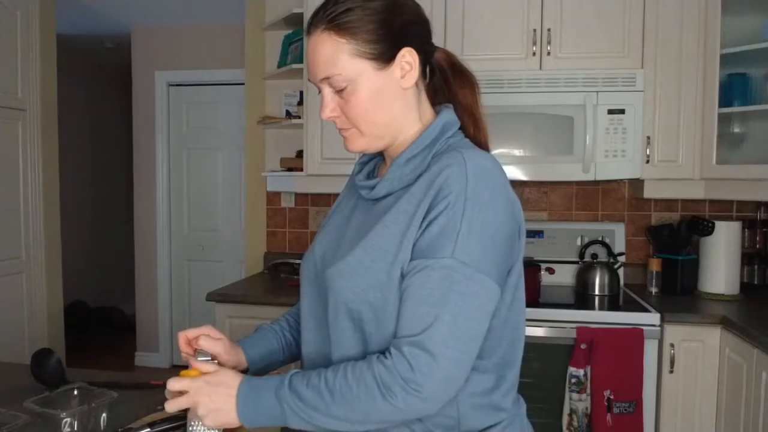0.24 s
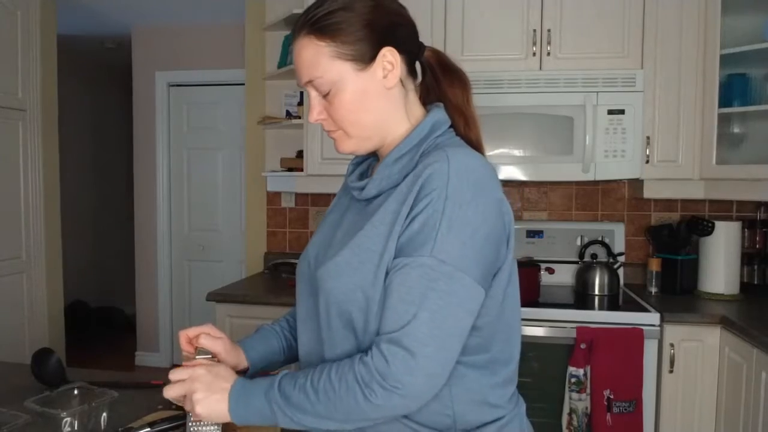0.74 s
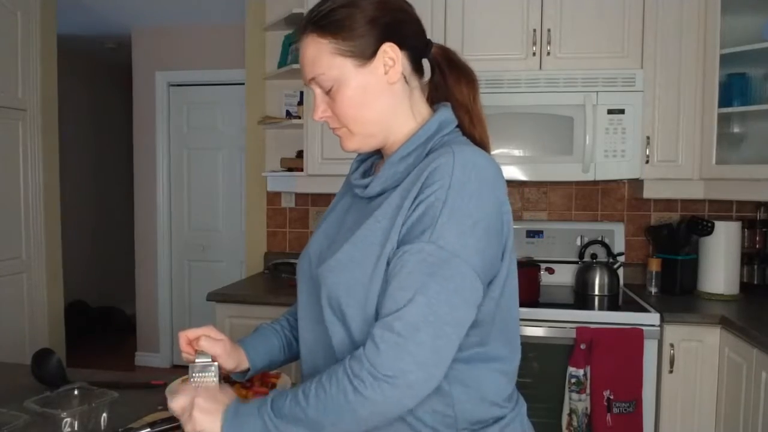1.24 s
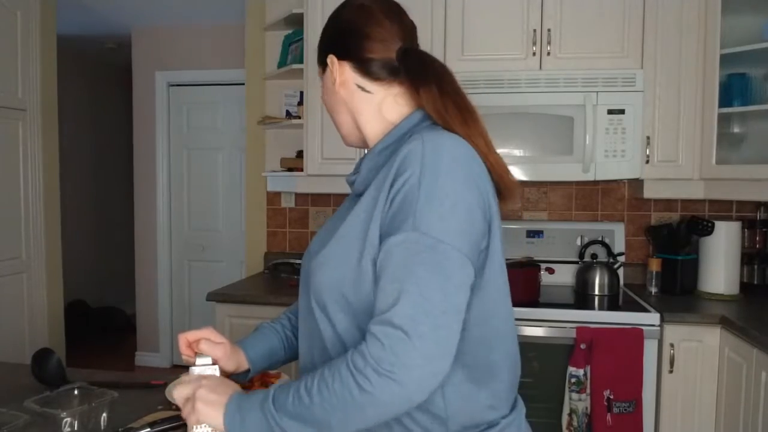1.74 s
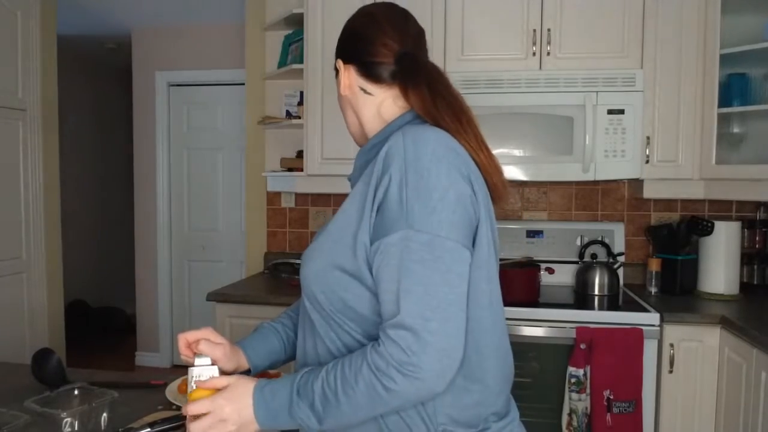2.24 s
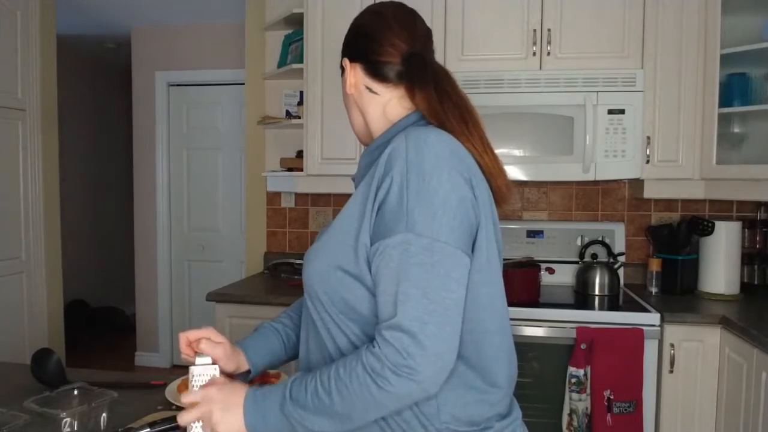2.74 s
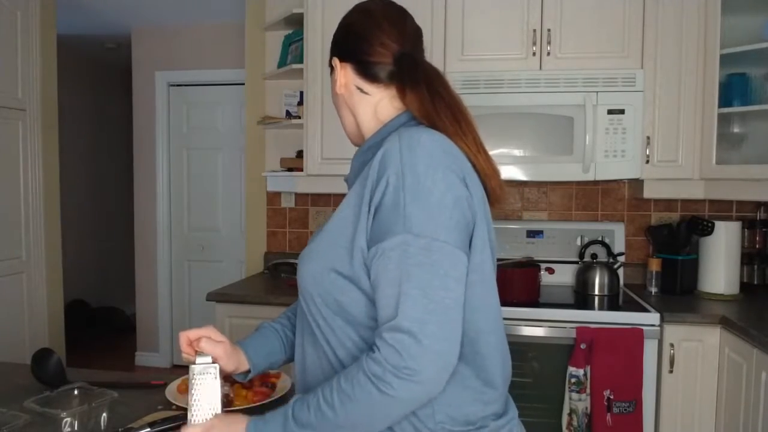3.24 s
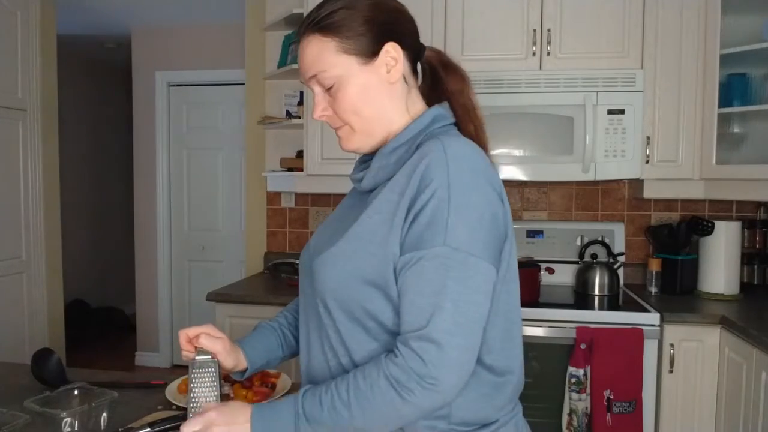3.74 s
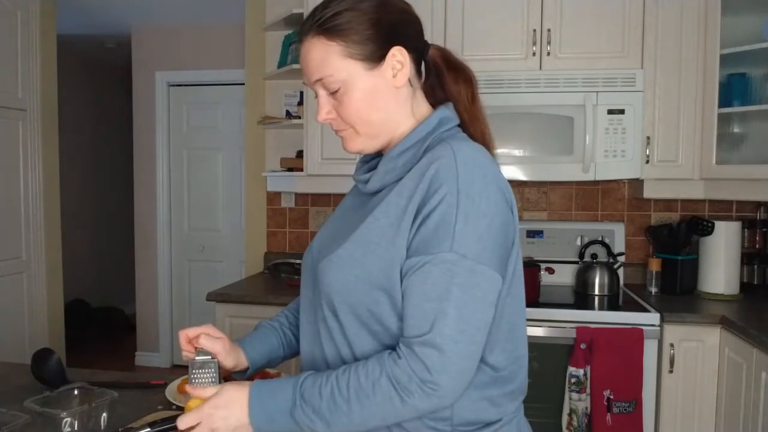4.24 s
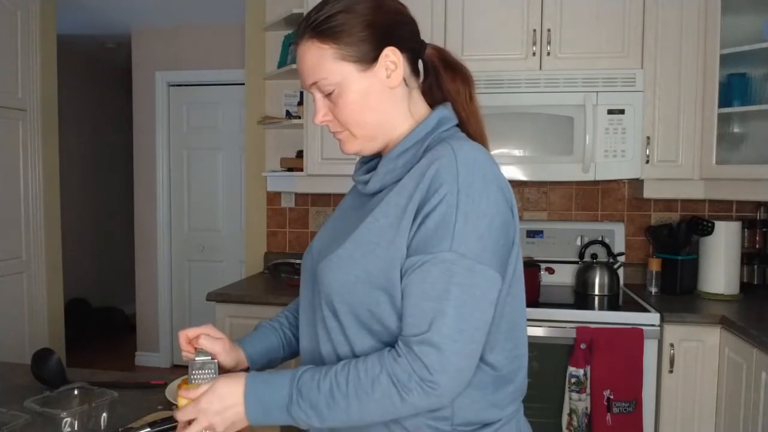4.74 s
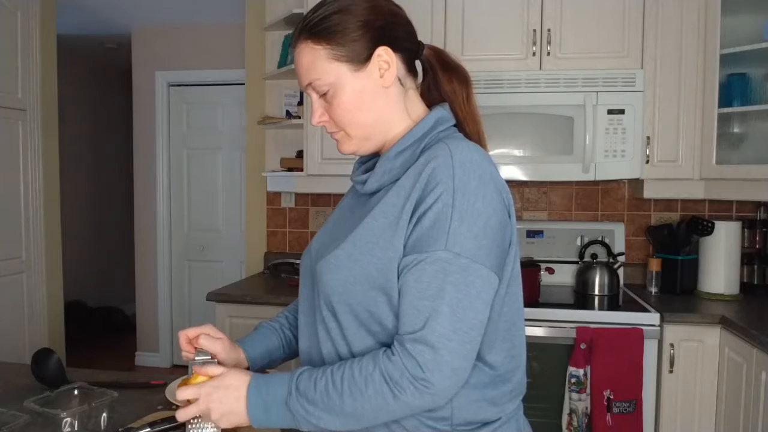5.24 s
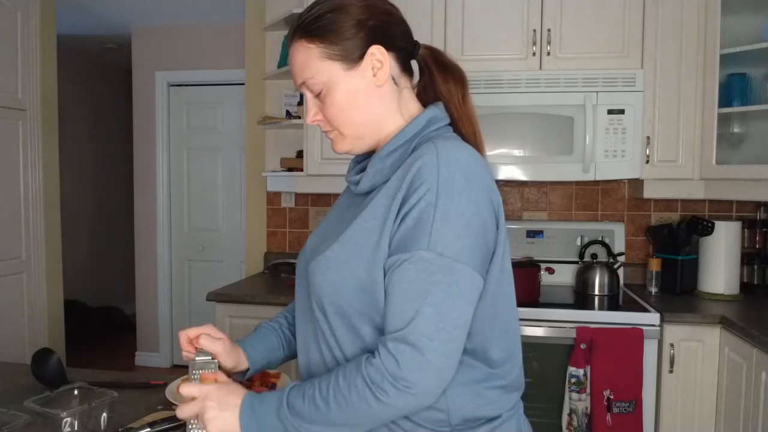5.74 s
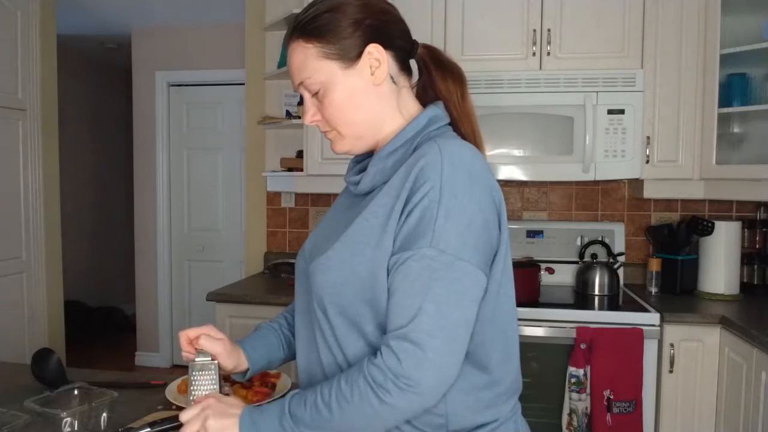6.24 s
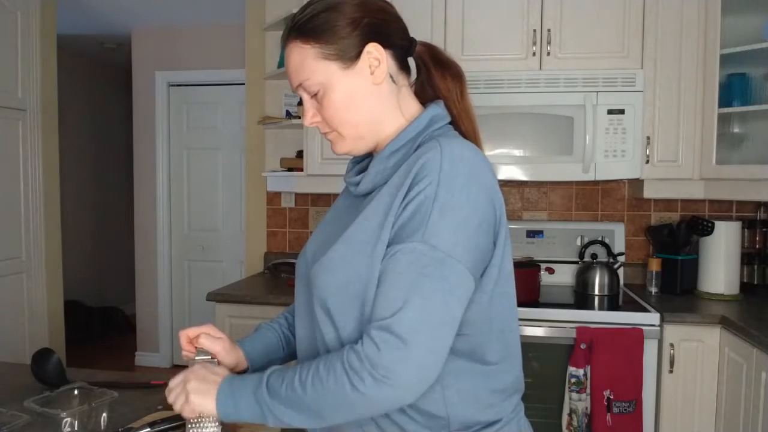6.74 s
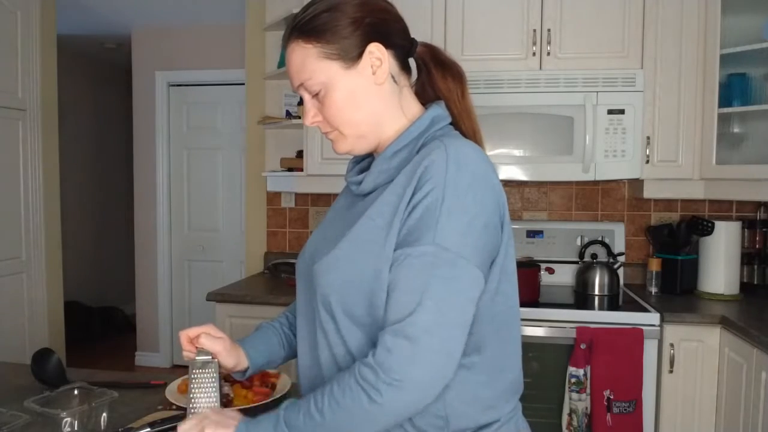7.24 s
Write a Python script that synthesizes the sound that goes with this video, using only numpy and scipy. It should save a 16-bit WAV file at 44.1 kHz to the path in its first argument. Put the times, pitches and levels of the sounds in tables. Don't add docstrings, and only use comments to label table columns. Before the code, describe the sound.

Close stereo camera sound of a lemon being grated: a tiny click, three short downward scrapes, a momentary dropout, then three more scrapes. After a two-second lull with faint touches, six quicker, harsher strokes finish the clip. Thin steel rings, peel tears with a juicy fizz, the worktop booms softly, and hard walls add lively echoes over faint fridge hum and hiss.

```python
import sys
import numpy as np
from scipy import signal
from scipy.fft import rfft, irfft
from scipy.io import wavfile
from scipy.ndimage import uniform_filter1d

SR = 44100
rng = np.random.default_rng(int(sys.argv[2]) if len(sys.argv) > 2 else 0)


def elevation(decibels):
    levels = np.asarray(decibels, float)
    return 10 ** (levels / 20)


def wav_record(signal):
    frames = np.transpose(np.atleast_2d(signal))
    bounded = np.clip(frames, -1, 1)
    quanta = np.round(bounded * 32767).astype(np.int16)
    wavfile.write(sys.argv[1], SR, quanta)


N = 330309


def read(points, hz):
    f, value = np.transpose(points)
    return np.interp(np.log(hz + 1), np.log(f + 1), value)


def evened(x):
    return x / np.sqrt(np.mean(x ** 2) + 1e-20)


def wander(per_s):
    lowpass = signal.butter(2, per_s, fs=SR, output="sos")
    return evened(signal.sosfilt(lowpass, rng.standard_normal(N)))


def split(x, lo_hz, hi_hz):
    hz, z = np.fft.rfftfreq(N, 1 / SR), rfft(x)
    low = 1 / (1 + (hz / lo_hz) ** 4)
    high = 1 - 1 / (1 + (hz / hi_hz) ** 8)
    return [irfft(z * share, N) for share in (low, 1 - low - high, high)]


def pair(a, b, same):
    same = np.clip(same, -1, 1)[:, None]
    return np.array([a, same * a + np.sqrt(1 - same ** 2) * b])


def air(shape, level_db, patchy_db):
    # f/Hz, likeness (-1 to 1)
    air_same = [(60, 1), (180, 0.72), (550, -0.11), (1650, -0.0026), (4970, -0), (15000, -0.13)]
    # f/Hz, left-right level/dB
    air_balance = [(60, 11.5), (180, 9), (550, 4.5), (1650, 0.5), (4970, 5), (15000, -4)]
    frames, hz = N // 512 + 5, np.fft.rfftfreq(2048, 1 / SR)
    a, b, c, d, patches = rng.standard_normal((frames, 1025, 5)).T
    patches = uniform_filter1d(patches, size=20, axis=0)
    patches = evened(uniform_filter1d(patches, size=8, axis=1))
    colour = elevation(read(shape, hz)[:, None] + patchy_db * patches)
    z = pair(a + 1j * b, c + 1j * d, read(air_same, hz)) * colour
    z *= elevation(np.array([.5, -.5])[:, None, None] * read(air_balance, hz)[:, None])
    noise = signal.istft(z, nperseg=2048, noverlap=1536)[1][:, :N]
    return elevation(level_db) * noise / np.std(noise.mean(0))


def rumble():
    # f/Hz, level/dB per Hz
    rumble_colour = [(15, -51), (25, -49), (60, -0.5), (104, -5.5), (124, 0), (159, -6.5), (209, -9.5),
                     (242, -12), (332, -11.5), (361, -16), (623, -17.5), (854, -24.5), (3800, -30.5),
                     (4940, -55), (8360, -120)]
    return air(rumble_colour, level_db=-54.5, patchy_db=1.1)


def hiss():
    # f/Hz, level/dB per Hz
    hiss_colour = [(2060, -45), (3500, -33), (3800, -6), (4050, 0), (4680, -4), (5280, 5), (6680, -6.5),
                   (7250, -0.5), (8130, -8), (9050, -1.5), (9700, -2), (10700, -1.5), (13500, -10.5),
                   (15100, 1.5), (15900, -7)]
    return air(hiss_colour, level_db=-69, patchy_db=.7)


def fridge():
    # f/Hz, level/dB
    hum = [(245.7, -65), (362, -82), (140, -67)]
    t, out = np.arange(N) / SR, np.zeros(N)
    for hz, db in hum:
        out += np.sqrt(2) * elevation(db + 2.3 * wander(0.77)) * np.sin(2 * np.pi * hz * t)
    return out


def focus(case_hz=430, t60=.03, spread_db=3.5, steps_per_s=30):
    # first t/s, last t/s, level/dB
    focus_runs = [
        (.007, 1.85, -46.5),
        (1.899, 3.9, -47),
        (3.932, 7.49, -90),
    ]
    steps = np.zeros(N)
    for first, last, db in focus_runs:
        at = (np.arange(first, last, 1 / steps_per_s) * SR).astype(int)
        steps[at] = elevation(db - spread_db * 2 * rng.random(150)[:len(at)])
    t = np.arange(1500) / SR
    modes = np.sin(2 * np.pi * case_hz * t) + .45 * np.sin(2 * np.pi * 750 * t)
    knock = elevation(-60 * t / t60) * modes * (1 - np.exp(-t / .0012))
    return signal.oaconvolve(steps, knock)[:N] * elevation(np.array([[1.5], [-1.5]]))


def counter(drift=0.0327, hold_s=0.013, top_mode_db=-8.5):
    # f/Hz, left-right level/dB, lag of the right port/rad
    modes = [
        (49, 8, .4),
        (78, 17, 1.5),
        (95, 3, .5),
        (165, 4, .3),
    ]
    # t/s, slow mode level/dB, main mode level/dB, upper modes level/dB
    shoves = [ (0.250, -62, -43, -49), (0.315, -58, -38, -61), (0.480, -59, -48.5, -71),
              (1.004, -47, -34.5, -41), (1.074, -36, -27, -43.5), (1.150, -40, -36, -55),
              (1.389, -31, -29.5, -30), (1.709, -31.5, -25, -37), (1.925, -39.5, -34, -51),
              (2.918, -44, -26, -32.5), (3.301, -35, -31.5, -42), (3.670, -28, -33, -35),
              (3.760, -30.5, -30, -39.5), (3.988, -46.5, -40.5, -50), (4.800, -66, -62, -52.5),
              (4.960, -75, -49.5, -60), (5.715, -55, -42, -42), (5.815, -37, -26.5, -39),
              (5.940, -33.5, -26, -42), (6.110, -38.5, -34.5, -58), (6.313, -23.5, -28.5, -30.5),
              (6.546, -32, -33, -37), (6.670, -36, -28, -45.5), (6.730, -37, -32.5, -56),
              (6.856, -37.5, -50, -43), (6.958, -37, -24, -41), (7.030, -43, -30, -49),
              (7.214, -48, -41, -66), (7.330, -24.5, -30, -33.5), (7.428, -39, -31.5, -54)]
    swing_up = [157, 212, 193, 197]
    swing_down = [119, 89, 194, 171]
    t, out = np.arange(N) / SR, np.zeros((2, N))
    s, slow_db, main_db, upper_db = np.transpose(shoves)
    coarse = t[::100]
    since = coarse - s[:, None]
    for k, peak_db in enumerate([slow_db, main_db, upper_db, upper_db + top_mode_db]):
        hz, pan_db, lag = modes[k]
        rise_db = swing_up[k] * since
        fall_db = -swing_down[k] * np.maximum(since - hold_s, 0)
        level_db = (peak_db[:, None] + np.minimum(rise_db, fall_db)).max(axis=0)
        angle = 2 * np.pi * np.cumsum(hz * (1 + drift * wander(9.9))) / SR
        swing = 2 * np.sqrt(2) * elevation(np.interp(t, coarse, level_db)) / (1 + elevation(-pan_db))
        out += swing * np.array([np.sin(angle), elevation(-pan_db) * np.sin(angle - lag)])
    return out


def kitchen(x, gap_s=.001, early_db=15, early_s=.005):
    # f/Hz, t60/s
    decay = [(100, 1), (420, 1), (1100, 0.82), (2900, 0.79), (7700, 0.67), (14000, 0.36)]
    # f/Hz, likeness (-1 to 1)
    room_same = [(100, 1), (640, 0.46), (1400, 0), (15000, 0.036)]
    taps = np.zeros((2, SR))
    at = np.arange(round(gap_s * SR), SR - 20, 20)
    at = at + rng.integers(0, 20, (2, SR))[:, :len(at)]
    signs = rng.choice([-1., 1.], (2, SR))[:, :at.shape[1]]
    np.put_along_axis(taps, at, signs, 1)
    hz, t, z = signal.stft(taps, SR, nperseg=512)
    decay_db = -60 * t / read(decay, hz)[:, None] + 10.5 * np.exp(-t / 0.12)
    z = pair(*z, read(room_same, hz)) * elevation(decay_db)
    t = np.arange(SR) / SR
    tail = signal.istft(z, SR, nperseg=512)[1][:, :SR]
    tail = tail * (t > gap_s) * elevation(early_db * np.exp(-t / early_s))
    return signal.fftconvolve(x[None], tail / np.linalg.norm(tail[0]), axes=1)[:, :N]


def nails(t60=.012):
    # t/s, peak level/dB, f/Hz
    nail_clicks = [
        (.2225, -42, 5300),
        (.897, -56, 5000),
        (2.388, -57, 4500),
        (4.759, -49, 5800),
    ]
    out, t = np.zeros(N), np.arange(600) / SR
    for s, db, hz in nail_clicks:
        click = sum(np.sin(2 * np.pi * hz * k * t) for k in (.72, .86, 1, 1.12, 1.35)) / 3
        out[round(s * SR):][:600] += elevation(db - 60 * t / t60) * click
    return out


def body(shape, ring):
    # f/Hz, width/Hz
    steel_rings = [(425, 60), (510, 90), (775, 60), (1310, 70), (2350, 250), (3470, 120), (5150, 300),
                   (5500, 700)]
    hz = abs(np.fft.fftfreq(8192, 1 / SR))
    rings = sum(ring / (1 + (2 * (hz - f) / width) ** 2) for f, width in steel_rings)
    log_gain = np.log(elevation(np.maximum(read(shape, hz), -60)) * (1 + rings))
    return np.fft.ifft(np.exp(np.conj(signal.hilbert(log_gain)))).real[:4096]


def parts(drive, board_hz=1600, fizz_hz=7000):
    # f/Hz, level/dB per Hz
    board_colour = [(120, -26), (200, 0), (323, -11), (421, -7.5), (520, -5), (620, -9), (710, -1.5),
                    (860, -2.5), (1000, -7), (1280, -3), (1800, -22), (3000, -60)]
    # f/Hz, level/dB per Hz
    rasp_colour = [(820, -42), (1400, -1), (1750, -1.5), (2350, 1), (2820, -6), (3360, -1), (4600, -2),
                   (5040, -0.5), (5640, -3.5), (6430, -9), (10500, -10), (11400, -17), (14200, -9),
                   (15100, -11.5), (15900, -16)]
    struck_board = signal.oaconvolve(drive, body(board_colour, 0.59))[:N]
    struck_steel = signal.oaconvolve(drive, body(rasp_colour, 0.047))[:N]
    thud = split(struck_board, board_hz, fizz_hz)[0]
    steel, fizz = split(struck_steel, board_hz, fizz_hz)[1:]
    return evened(thud), evened(steel), evened(fizz)


def contact():
    # bite t/s, bite level/dB, time to full pressure/s, full level/dB, slide-off time/s
    strokes = [ (0.944, -39, 0.066, -27, 0.15), (1.269, -42.5, 0.07, -23.5, 0.078),
               (1.6, -36.5, 0.035, -25.5, .14), (2.798, -47, 0.067, -27, 0.14),
               (3.204, -37.5, 0.066, -27, 0.11), (3.592, -34.5, 0.082, -24, 0.092),
               (5.736, -47.5, 0.077, -30, 0.15), (5.926, -33, 0.0057, -32, .11),
               (6.208, -28, 0.055, -24.5, 0.11), (6.549, -32.5, 0.07, -24, 0.085),
               (6.863, -30.5, 0.03, -24.5, .14), (7.233, -29, 0.059, -24.5, 0.11)]
    # t/s, level/dB, length/s, thud level/dB re tearing
    touches = [ (0.223, -57, 0.027, 6), (0.905, -52.5, 0.064, -5), (0.939, -45, 0.009, 0),
               (1.575, -56, 0.022, 7), (1.880, -49.5, 0.054, 3), (2.390, -56, 0.022, 3),
               (3.160, -55, 0.11, 1), (3.552, -56, 0.053, 14.5), (4.650, -68, 0.11, 6.5),
               (4.904, -66.5, .02, 10), (5.390, -63, 0.11, -5), (5.695, -52, 0.085, 8.5),
               (6.192, -41, 0.021, 4.5), (6.518, -35.5, 0.044, -2), (6.840, -40, 0.021, -4),
               (7.211, -39, 0.04, -6)]
    press_bend, slide_db, slide_bend, lift_db_per_s = 0.84, -25.5, 1.52, 600
    thud_re_tear_db, fizz_re_tear_db, dry_db = -5, -6, -6.5
    out = np.zeros((3, N + SR))
    for s, bite_db, press_s, full_db, slide_s in strokes:
        t = np.arange(SR // 2) / SR
        slid = np.maximum(t - press_s, 0) / slide_s
        sliding = np.minimum(slid, 1)
        db = bite_db + (full_db - bite_db) * np.minimum(t / press_s, 1) ** press_bend
        db = db + slide_db * sliding ** slide_bend
        db = db - lift_db_per_s * slide_s * np.maximum(slid - 1, 0)
        gains = elevation([db, db + thud_re_tear_db, db + fizz_re_tear_db + dry_db * sliding])
        out[:, round(s * SR):][:, :len(t)] += gains
    out = uniform_filter1d(out, size=260, origin=129, axis=1)
    for s, db, length, thud_db in touches:
        fade_db = db - 12 * np.arange(0, length, 1 / SR) / length
        out[:, round(s * SR):][:, :len(fade_db)] += elevation([fade_db, fade_db + thud_db, fade_db - 8])
    return out[:, :N]


def grater(tears_per_s=11000, spread_db=3.3, chatter_db=3.0, snag_s=.003, snag_db=-8):
    # t/s, peak level/dB
    snag_hits = [(0.948, -29), (1.0331, -21), (1.351, -32), (1.6139, -16), (1.652, -33), (2.8084, -45),
                 (3.2151, -41), (3.5518, -43), (3.605, -21), (5.695, -34), (5.718, -37), (5.7385, -28),
                 (5.924, -27), (6.192, -21), (6.2099, -15.5), (6.2544, -17), (6.2952, -10), (6.517, -31),
                 (6.5385, -25), (6.56, -12), (6.8414, -27), (6.8628, -21.5), (6.898, -9), (6.9516, -6),
                 (7.2367, -17)]
    ticks = elevation(spread_db * np.minimum(rng.exponential(1, N), 5)) * rng.choice([-1, 1], N)
    rows = signal.butter(1, [25, 90], "band", fs=SR, output="sos")
    chatter = evened(signal.sosfilt(rows, rng.standard_normal(N)))
    ticks *= (rng.random(N) < tears_per_s / SR) * elevation(chatter_db * chatter)
    thud, steel, fizz = parts(ticks)
    tear, press, juice = contact()
    steady = tear * steel + press * thud + juice * fizz
    snags = np.zeros(N)
    for s, db in snag_hits:
        snags[round(s * SR)] = elevation(db + snag_db)
    snags = signal.lfilter([1], [1, -np.exp(-1 / (snag_s * SR))], snags)
    thud, steel, fizz = parts(rng.choice([-1., 1.], N))
    return steady + snags * (steel + 0.36 * thud + .5 * fizz)


def scene():
    # f/Hz, left-right level/dB
    port_balance = [(200, 2.5), (1500, 1), (5000, 1), (9000, 0.5), (13000, -3.5)]
    rasp = grater()
    close = rasp + 2 * nails()
    direct = np.array([close, np.roll(close, shift=7)])
    turn = 2 * np.pi * np.cumsum(14 + 3 * wander(2)) / SR
    echoes = sum(kitchen(rasp * np.sqrt(2 / 3) * np.cos(turn + k * np.pi / 3)) for k in range(3))
    hz = np.fft.rfftfreq(N, 1 / SR)
    lean = elevation(np.outer([.5, -.5], read(port_balance, hz)))
    near = irfft(rfft(elevation(-7.5) * direct + elevation(-1.54) * echoes) * lean, N)
    house = rumble() + hiss() + fridge()
    return near + counter() + house + focus()


def low_pass(x):
    return signal.sosfilt(signal.butter(12, 16110, fs=SR, output="sos"), x)


def record(dry):
    change_s, fade_s, edge_hz = 1.868, .036, 15450
    fade = np.clip(abs(np.arange(N) / SR - change_s) / fade_s, 0, 1)
    lowpass = signal.firwin(255, edge_hz, window=("kaiser", 6), fs=SR)
    limited = signal.oaconvolve(dry * fade ** 2, lowpass[None], "same")
    return low_pass(limited)


dry = scene()
out = record(dry)
wav_record(out)
```